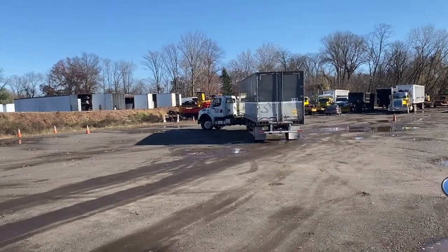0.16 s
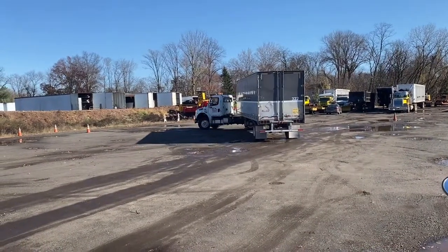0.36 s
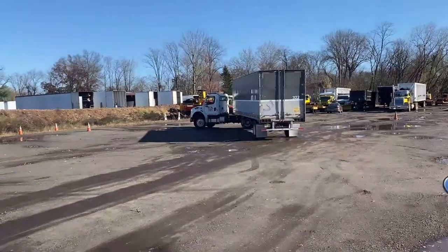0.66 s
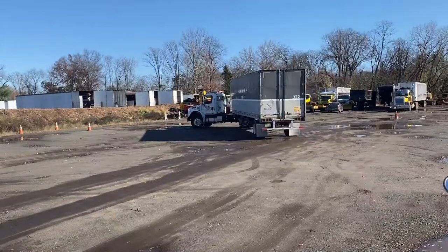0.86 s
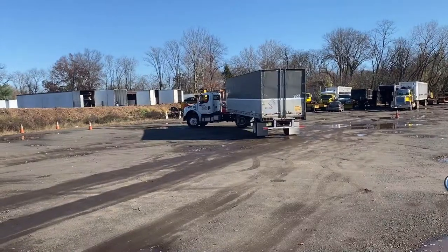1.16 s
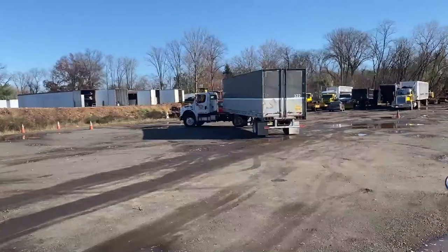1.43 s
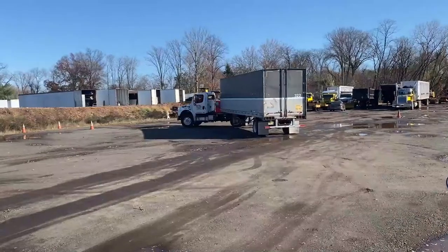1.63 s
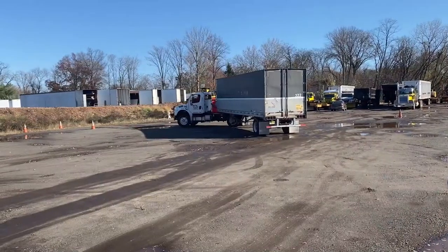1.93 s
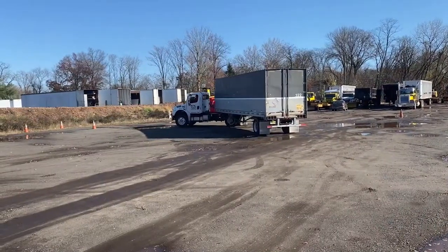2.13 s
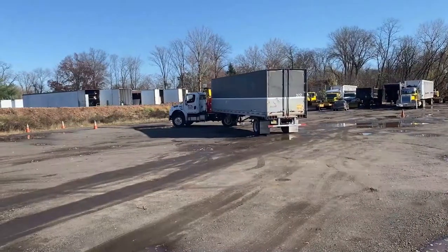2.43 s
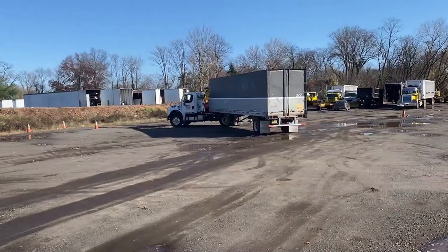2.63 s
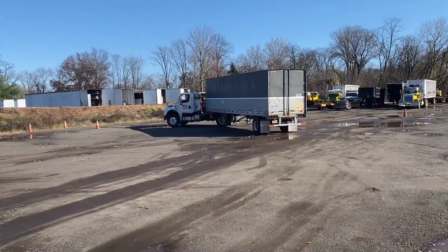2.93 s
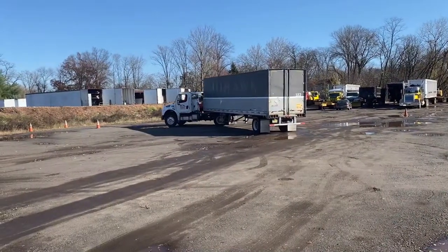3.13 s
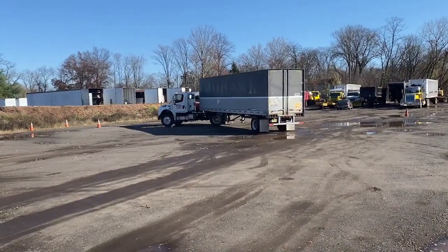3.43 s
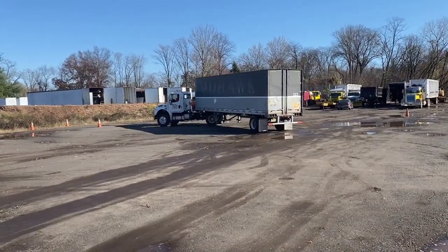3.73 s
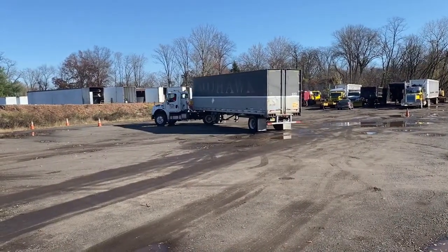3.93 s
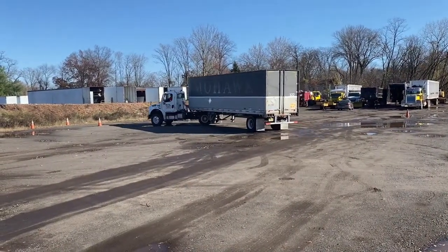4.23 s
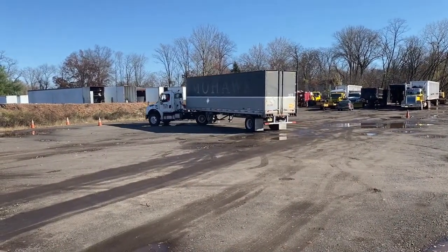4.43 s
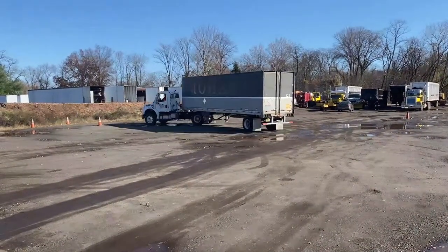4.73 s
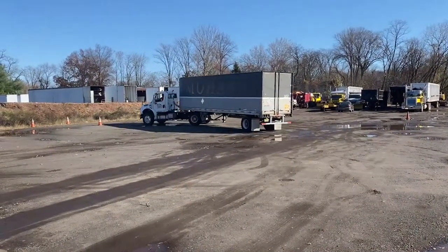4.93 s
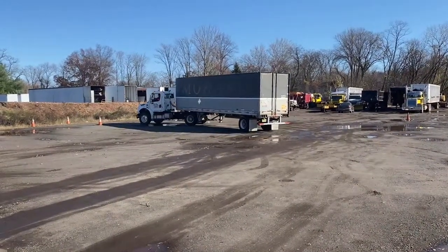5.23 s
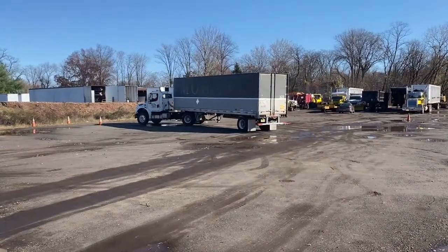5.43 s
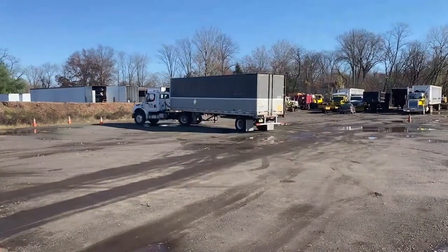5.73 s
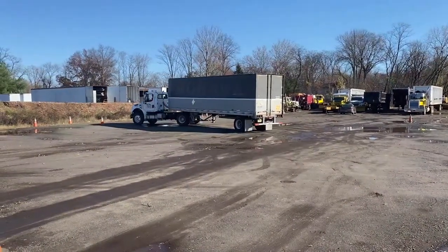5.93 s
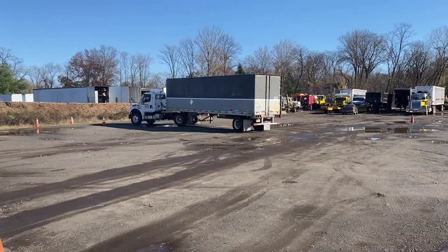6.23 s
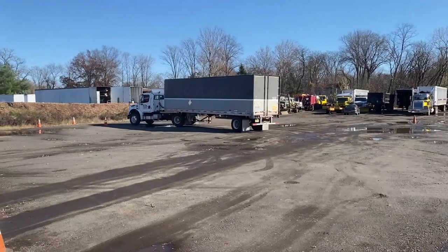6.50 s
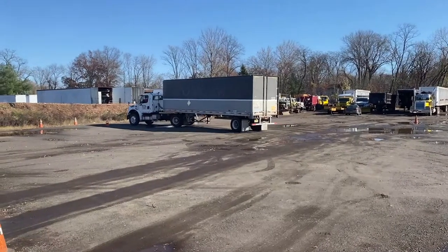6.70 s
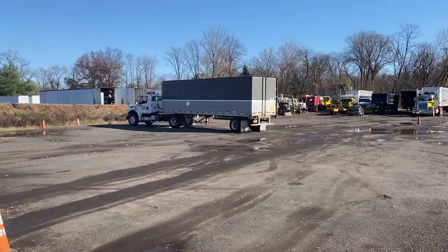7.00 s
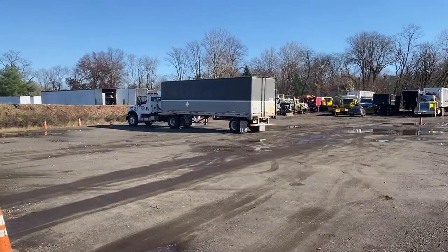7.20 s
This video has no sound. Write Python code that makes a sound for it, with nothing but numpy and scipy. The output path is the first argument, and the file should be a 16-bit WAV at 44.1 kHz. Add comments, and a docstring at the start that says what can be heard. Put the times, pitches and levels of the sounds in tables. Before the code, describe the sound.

Outdoors in an open gravel yard, a handheld phone catches dull wind thumps in the first second over a low murmur. A distant diesel idle, muffled behind its trailer, gradually emerges with clatter, ticking, fan hum and lumpy exhaust. Small grit cracks and brief chassis squeaks pass midway. Near the end wind knocks return, the heaviest just after seven seconds, and air hisses.

```python
"""A six-cylinder diesel truck creeps across an open yard at idle, slowly turning its engine towards a phone.
Exhaust lines, gears and a fan drone as fluttering tones; noise paced by the firings clatters, ticks and booms.
Gusts of low noise and falling-pitch eddies hit the microphone with dull, heavy thumps over the yard's murmur.
Short noise bursts make sharp cracks, fine grit crackles as clicks, the chassis squeaks as a rough sine,
tyres scuff as faint rasps, and air hisses near the end."""
import sys
import numpy as np
from scipy import signal
from scipy.fft import rfft, irfft, next_fast_len
from scipy.io import wavfile
from scipy.ndimage import uniform_filter1d

SR = 44100
rng = np.random.default_rng(int(sys.argv[2]) if len(sys.argv) > 2 else 0)


def store_wav(level_fs):
    """Save 16-bit WAV to argv[1]."""
    pcm = np.round(np.clip(np.atleast_2d(level_fs), -1, 1) * 32767)
    wavfile.write(sys.argv[1], SR, pcm.T.astype(np.int16))


N = 324576
TIME = np.arange(N) / SR
SIZE = next_fast_len(N + 8192)  # padding keeps filter tails from wrapping round
FREQS = np.maximum(np.fft.rfftfreq(SIZE, 1 / SR), 1)


def undb(db):
    """Decibels to gain."""
    return 10 ** (np.asarray(db) / 20)


def unit(x):
    """Scale to rms 1."""
    return x / np.sqrt(np.mean(x ** 2))


def curves(table):
    """One value a sample for each column after the time."""
    times, *columns = np.transpose(table)
    return [np.interp(TIME, times, column) for column in columns]


def spectra(table):
    """One value a frequency bin for each column, drawn over log frequency."""
    hz, *columns = np.transpose(table)
    return [np.interp(np.log(FREQS), np.log(hz), column) for column in columns]


def noise():
    """Three unrelated noises: one shared, one for each port."""
    return rng.standard_normal((3, N))


def filtered(x, gain):
    """Apply a gain to each frequency."""
    return irfft(rfft(x, SIZE) * gain, SIZE)[..., :N]


def colour(x, table, modes=()):
    """Filter by a smooth spectrum with narrow resonances on top; rms 1."""
    db = spectra(table)[0]
    for hz, width, boost in modes:
        db = db + boost / (1 + (2 * (FREQS - hz) / width) ** 2)
    return unit(filtered(x, undb(db)))


def bell(hz, sharpness):
    """Gain of a band around one pitch, even in log frequency."""
    return 1 / (1 + (sharpness * np.log(FREQS / hz)) ** 4)


def walk(rate):
    """Smooth random drift of rms 1 with wiggles up to about rate Hz."""
    steps = rng.standard_normal(N // 20)
    glide = np.interp(2 * rate * TIME, np.arange(len(steps)), steps)
    return unit(uniform_filter1d(glide, max(int(SR / rate / 2), 1)))


def swell(start, length):
    """A rounded rise and fall."""
    return np.sqrt(np.maximum(np.sin(np.pi * np.clip((TIME - start) / length, 0, 1)), 0))


def shadow(start, length, db):
    """Loss in dB behind the trailer, lifting steadily as the source swings clear."""
    return db * (1 - np.clip((TIME - start) / length, 0, 1))


def tone(turns, flutter, flutter_hz):
    """A steady core with a flutter of scattered sound around it; rms 1."""
    sway = 1 + flutter * (walk(flutter_hz) + 1j * walk(flutter_hz)) / np.sqrt(2)
    return unit(np.real(sway * np.exp(2j * np.pi * (turns + rng.random()))))


# the governor hunts around idle: (t/s, four-stroke cycle rate f/Hz)
CYCLE_RATE = [(3.1, 6.38), (3.49, 6.4), (3.57, 6.31), (3.73, 6.3), (3.91, 6.31), (3.99, 6.39), (4.39, 6.41),
              (4.61, 6.37), (6.02, 6.41), (6.4, 6.49)]


def crank():
    """Cycles turned so far: idle speed with a slight unsteadiness."""
    return np.cumsum(curves(CYCLE_RATE)[0] * (1 + 0.00154 * walk(3))) / SR


# relative knock of each cylinder in firing order: level/dB, before a random spread
CYLINDER_KNOCK = [4.85, 2.5, 3.1, 2.6, 6.2, 6]


def knocks(cycles, decay, smear_hz):
    """Each of six firings a cycle strikes the block and dies away; echoes off the chassis round the attack."""
    firing = cycles * len(CYLINDER_KNOCK)
    index = firing.astype(int)
    spread_db = 3.9 * np.tanh(rng.standard_normal(N))[index]
    size_db = np.array(CYLINDER_KNOCK)[index % len(CYLINDER_KNOCK)] + spread_db
    blows = undb(size_db) * np.exp(-(firing % 1) / decay)  # decay as a share of the firing gap
    return unit(filtered(blows, 1 / (1 + (FREQS / smear_hz) ** 2)))


def rattle(x, depth_db, rate_hz, count):
    """Each half-octave of the clatter flickers on its own as the blows excite different panels."""
    place = np.clip(2 * np.log2(FREQS / 400), 0, count - 1)
    out = 0
    for k in range(count):
        band = filtered(x, np.maximum(1 - np.abs(place - k), 0))
        out = out + band * undb(depth_db * walk(rate_hz))
    return out


# the engine grows louder as the cab turns into view: (t/s, level/dB before each layer's gain)
ENGINE_LEVEL = [(0.0, -75), (1.3, -67.5), (1.75, -63.5), (2.0, -59), (3.85, -56), (5.54, -54.5),
                (5.63, -53.5), (6.32, -53.5), (7.2, -50.5)]


def engine_level():
    """Level in dB that clatter, exhaust, fan and gravel follow, each with its own gain."""
    return curves(ENGINE_LEVEL)[0]


# ringing panels of the engine and cab: (f/Hz, width f/Hz, boost level/dB)
PANELS = [(551, 16, -4.5), (650, 80, -4.5), (836, 99, 6), (1086, 13, 5.5), (1173, 78, 2.5), (1303, 54, 3.5),
          (1490, 110, 3), (2060, 37, 1.5), (2366, 29, 4.5), (2507, 190, 8), (3300, 550, 4), (4800, 120, 3)]
# tone of the combustion clatter: (f/Hz, relative level/dB)
CLATTER_COLOUR = [(250, -2.5), (450, 2.5), (700, 0.5), (950, -0.5), (1250, -2.5), (1750, -8.5), (2250, -10),
                  (2650, -14), (2950, -19), (3380, -20.5), (3800, -23.5), (4800, -26.5), (8000, -56.5)]


def clatter(knock, block_db):
    """Combustion blows modulate noise that rings the panels."""
    blows = rattle(noise() * (1 + 0.7 * knock), depth_db=1.0, rate_hz=22, count=8)
    return colour(blows, CLATTER_COLOUR, PANELS) * undb(block_db + 10.5)


# tone of the valve ticking: (f/Hz, relative level/dB)
VALVE_COLOUR = [(2500, -20), (3400, -2), (4000, -4), (4800, -1), (6100, -7), (7500, -7), (9000, -13),
                (11500, -15), (15000, -26)]
# the engine's treble over time: (t/s, level/dB before the valve gain)
VALVE_LEVEL = [(0.0, -83.5), (2.0, -68), (3.21, -64.5), (3.31, -63), (3.33, -65.5), (6.58, -63.5),
               (7.2, -59)]


def valves(knock):
    """Valve ticking: bright noise pulsing with the firings, ringing the same panels."""
    ticking = noise() * (1 + 0.5 * knock)
    return colour(ticking, VALVE_COLOUR, PANELS) * undb(curves(VALVE_LEVEL)[0] + 0.5)


# tone of the exhaust puffs: (f/Hz, relative level/dB)
BOOM_COLOUR = [(25, -23), (55, -9), (90, 4), (130, -2.5), (190, -2), (240, -5), (300, 0.5), (380, -5),
               (500, -11), (700, -52), (1500, -78.5)]
# the engine's low, lumpy body over time: (t/s, level/dB)
BOOM_LEVEL = [(0.0, -74), (1.9, -61.5), (2.45, -56), (3.1, -47.5), (4.1, -47), (5.6, -43), (6.4, -40.5),
              (7.3, -39)]


def boom(cycles):
    """Lumpy exhaust puffs: low noise pushed by each firing, with uneven strength."""
    puffs = knocks(cycles, decay=0.4, smear_hz=90)
    lumps = noise() * (0.49 + puffs) * undb(0.81 * walk(9.7))
    return colour(lumps, BOOM_COLOUR) * undb(curves(BOOM_LEVEL)[0])


def engine_noise(cycles, block_db):
    """Combustion clatter, valve ticking and lumpy exhaust puffs, all paced by the firings."""
    knock = knocks(cycles, decay=0.95, smear_hz=111)
    return clatter(knock, block_db) + valves(knock) + boom(cycles)


# exhaust lines: (multiple of the cycle rate, level/dB before the engine level and gain, starts to clear t/s)
EXHAUST_LINES = [(12, -45.5, 2.3), (15, -41, 3), (24, -46, 2.4), (26, -58, 2.2), (30, -50.5, 2),
                 (34, -55, 1.4), (42, -54.5, 1.4), (45, -56, 2.0), (48, -53, 2.6), (63, -58, 1.7)]
PIPE_CLEAR_S, PIPE_SHADOW_DB = 1.04, -18.5  # time a line takes to clear the trailer; its loss behind it


def exhaust(cycles, block_db):
    """Low engine orders, each swaying in strength and coming out from behind the trailer in its own time."""
    out = 0
    for multiple, db, clears in EXHAUST_LINES:
        line_db = db + shadow(clears, PIPE_CLEAR_S, PIPE_SHADOW_DB)
        out = out + undb(line_db) * tone(multiple * cycles, flutter=0.65, flutter_hz=7)
    return out * undb(block_db + 52)


# wavering pitch of the fan: (t/s, f/Hz)
FAN_PITCH = [(2.2, 329.7), (2.28, 330.5), (2.46, 327.6), (2.61, 333.8), (3.44, 330.5), (3.72, 335.6),
             (4.38, 327.3), (4.77, 325.5), (5.04, 333.5), (5.23, 326), (6.5, 333.6)]


def fan(block_db):
    """The fan hums on a wavering pitch and throbs unevenly, hidden by the trailer, then a little by the cab."""
    trailer_db = shadow(start=2.05, length=0.2, db=-29)
    cab_db = shadow(start=3.87, length=0.31, db=-4)  # until the cab has turned
    throb = tone(np.cumsum(curves(FAN_PITCH)[0]) / SR, flutter=0.79, flutter_hz=16)
    return throb * undb(block_db + 9 + trailer_db + cab_db)


# gear hum: (multiple of the cycle rate, level/dB at its loudest, loudest at t/s, spread t/s)
GEAR_HUM = [(84, -52, 5.45, 0.14), (132.5, -54.5, 4.14, 1.7), (176, -51, 6.6, 0.45), (198.7, -63, 4.1, 0.8)]


def hum(cycles):
    """Rough gear tones follow the crank; each swells while its side of the engine faces the phone."""
    out = 0
    for multiple, db, facing, spread in GEAR_HUM:
        nearness = 1 / (1 + ((TIME - facing) / spread) ** 2)
        out = out + undb(db) * nearness * tone(multiple * cycles, flutter=0.68, flutter_hz=20)
    return out


def gravel(block_db):
    """Fine grit crackles all along, following the engine's level: sparse tiny clicks of random size."""
    clicks_per_s = 77
    clicks = (rng.random(N) < clicks_per_s / SR) * rng.standard_normal(N)
    return undb(block_db - 35) * unit(filtered(clicks, bell(6500, sharpness=2)))


# tone of the yard's murmur: (f/Hz, relative level/dB)
YARD_COLOUR = [(25, -13.5), (75, -5), (150, -7), (300, -5), (450, -10), (700, -17.5), (1200, -13),
               (1750, -21), (2500, -18), (3200, -37.5), (4400, -28.5), (7000, -76), (15000, -54)]


def yard():
    """The murmur of the yard: coloured noise that drifts slowly in level."""
    return colour(noise(), YARD_COLOUR) * undb(-59.0 + walk(0.51))


# tone of the breeze: (f/Hz, relative level/dB)
BREEZE_COLOUR = [(20, -33), (45, 8), (75, 6), (130, -1.5), (250, -13), (450, -20.5), (900, -83.5)]
# rumble of the breeze on the microphone: (t/s, level/dB before gain and wavering)
BREEZE_LEVEL = [(0.0, -51), (0.12, -57), (0.41, -38.5), (0.72, -56), (1.62, -58), (3.18, -69), (3.89, -52),
                (5.41, -53.5), (5.65, -53), (5.99, -43.5), (6.84, -44.5), (7.36, -37.5)]


def breeze():
    """Low turbulence on the microphone, wavering in level."""
    return colour(noise()[:2], BREEZE_COLOUR) * undb(curves(BREEZE_LEVEL)[0] + 5 + 2 * walk(6.1))


def gust(turbulence, start, length, db, edge_hz):
    """A swell of turbulence with a steep upper edge, levelled to the energy of its shape."""
    shape = swell(start, length)
    puff = filtered(turbulence, 1 / (1 + (FREQS / edge_hz) ** 5)) * shape
    return undb(db) * puff * np.sqrt(np.sum(shape ** 2) / np.sum(puff ** 2, axis=1, keepdims=True))


# gusts on the microphone: (start t/s, length t/s, level/dB, upper edge f/Hz)
GUSTS = [(0.094, 0.041, -38.5, 129), (0.292, 0.074, -32.5, 523), (0.36, 0.03, -26.5, 750),
         (0.401, .036, -33.5, 760), (0.438, 0.029, -33.5, 950), (0.509, 0.021, -38, 480),
         (0.63, .03, -49.5, 420), (0.725, 0.046, -43.5, 730), (1.255, 0.043, -45, 470),
         (2.116, 0.095, -41.5, 370), (2.282, 0.067, -46.5, 160), (2.467, 0.13, -44, 384),
         (2.769, 0.064, -43, 150), (5.789, .025, -33, 150), (5.835, 0.087, -29.5, 140),
         (6.17, .04, -32, 130), (6.238, 0.026, -33, 123), (6.488, .04, -30, 140),
         (6.519, 0.061, -27.5, 270), (6.62, 0.058, -36.5, 109.3), (6.883, 0.041, -32.5, 228),
         (7.162, 0.085, -19.5, 228), (7.248, 0.073, -36, 290)]
WAKE_S, WAKE_DB, WAKE_EDGE = 0.081, -7, 0.41  # wake length; level and edge (as a share) against its gust


def gusts():
    """Puffs of low turbulence, each trailing a weaker, duller wake."""
    turbulence = filtered(noise()[:2], 1 / (1 + (50 / FREQS) ** 4) / np.sqrt(1 + FREQS / 120))
    out = 0
    for start, length, db, edge_hz in GUSTS:
        out = out + gust(turbulence, start, length, db, edge_hz)
        out = out + gust(turbulence, start + length, WAKE_S, db + WAKE_DB, edge_hz * WAKE_EDGE)
    return out


EDDY_SLOWING = 0.41  # an eddy's pitch falls by this many factors e before it peaks


def eddy(start, hz, peak_turns):
    """A vortex passes the port: a blunt pressure swing that drops in pitch and dies within a few cycles."""
    age = TIME[:SR // 2]
    rise = np.log1p(EDDY_SLOWING * hz * age / peak_turns) / EDDY_SLOWING
    swing = (rise * np.exp(1 - rise)) ** 2 * np.sin(2 * np.pi * rise * peak_turns)
    blunting = signal.butter(3, 2 * hz, fs=SR, output="sos")
    swing = signal.sosfiltfilt(blunting, swing)
    return np.pad(swing, (int(start * SR), N))[:N]


SHRED_RISE_S, SHRED_FALL_S = 0.0021, 0.0094


def shreds(start, hz):
    """An eddy frays into smaller whirls that rattle briefly around it."""
    age = TIME[:SR // 4] - TIME[SR // 8]  # negative before the eddy starts
    band = signal.butter(4, [hz / 5, hz], "band", fs=SR, output="sos")
    whirls = unit(signal.sosfilt(band, rng.standard_normal(len(age))))
    whirls = whirls * np.exp(-np.maximum(-age / SHRED_RISE_S, age / SHRED_FALL_S))
    return np.pad(whirls, (int(start * SR), N))[SR // 8:][:N]


# eddies that knock on the microphone: (start t/s, level/dB, starting pitch f/Hz, cycles to the peak)
EDDIES = [(.312, -21.5, 717, 1.9), (.319, -19.5, 194, 0.55), (.333, -21, 258, 0.68),
          (0.338, -21.5, 720, 1.44), (.354, -23.5, 550, 1.17), (0.3673, -16, 520, 0.75),
          (0.375, -21, 508, 1), (.409, -21.5, 254, 0.9), (0.416, -21, 259, 0.69), (.433, -27, 1060, 1.4),
          (0.4456, -14.5, 740, 0.7), (0.454, -22, 108, 0.74), (.4925, -15, 800, 1.26),
          (0.501, -22, 173, 0.76), (.589, -28, 510, 0.44), (0.7561, -27.5, 1190, 0.58),
          (.794, -40.5, 420, 1.1), (0.86, -40.5, 520, 0.95), (0.875, -35, 380, 0.76),
          (0.925, -43.5, 720, 1.1), (0.974, -28.5, 760, 0.62), (0.981, -33, 152, 0.47),
          (1.161, -36, 390, 1.7), (1.273, -38.5, 454, 1.2), (1.293, -41, 130, 1.3), (1.34, -40, 430, 1.43),
          (1.607, -39.5, 400, 0.57), (1.945, -37, 240, 1.04), (2.071, -31, 397, 0.63),
          (2.163, -37.5, 322, 1.26), (2.626, -37.5, 170, 1.3), (2.794, -43, 150, 1.5),
          (5.954, -21, 111, 1.13), (6.139, -20.5, 150, 0.81), (6.527, -21.5, 348, 0.99),
          (6.539, -21.5, 275, 1.16), (6.551, -24, 114, 1.07), (6.720, -35, 225, 1.32),
          (6.950, -21, 214, 0.74), (7.118, -18.5, 105, 0.77), (7.1646, -4.5, 308, 0.91),
          (7.178, -10, 140, 0.89), (7.1926, -8.5, 176.5, 0.93), (7.226, -14.5, 135, 0.96)]


def eddies():
    """Single vortices, each wrapped in rough air 11 dB weaker."""
    out = 0
    for start, db, hz, turns in EDDIES:
        out = out + undb(db) * (eddy(start, hz, turns) + undb(-11) * shreds(start, hz))
    return out


WIND_LAG_S, WIND_UNLIKE = 0.00034, 0.38  # air reaches the left port later; gain of the opposed part


def wind():
    """Turbulence at the ports: a low breeze, gusts with their wakes, and single eddies."""
    air = breeze() + gusts()
    sides = np.array([[1], [-1]])
    lag = np.exp(-1j * np.pi * FREQS * sides * WIND_LAG_S)
    return filtered(air[0] + eddies(), lag) + WIND_UNLIKE * air[1] * sides


# sharp cracks: the first two are the bright edges of wind knocks, the rest may be stones under the tyres: #
# (start t/s, level/dB before attack and decay, centre f/Hz, decay t/s)
CRACKS = [(0.756, -43.5, 1600, 0.0042), (0.921, -55, 4700, 0.003), (3.048, -38, 10400, 0.0016),
          (3.251, -49.5, 5670, 0.0065), (3.300, -49, 5360, 0.007), (3.457, -46, 4770, 0.0041),
          (3.645, -59, 11500, 0.014)]


def cracks():
    """Sharp cracks: short bursts of noise around one pitch each, with a quick attack and decay."""
    out = np.zeros(N)
    attack_s = 0.0049
    for start, db, hz, decay in CRACKS:
        age = np.maximum(TIME - start, 0)
        burst = unit(filtered(rng.standard_normal(N), bell(hz, sharpness=2)))
        out += undb(db) * burst * (1 - np.exp(-age / attack_s)) * np.exp(-age / decay)
    return out


# chassis squeaks: (start t/s, length t/s, level/dB before roughness, lowest f/Hz before waver, sag as a share)
SQUEAKS = [(4.096, .068, -52, 2820, 0.003), (4.690, 0.083, -46.5, 2755, .06),
           (4.754, 0.04, -48, 2820, .015)]
SQUEAK_ECHO_S, SQUEAK_ECHO_DB = 0.0397, -13  # the trailer's side throws the squeak back


def squeaks():
    """A dry joint sings briefly and roughly as it sticks and slips; its pitch sags as it grips hardest."""
    out = 0
    waver = walk(260)
    grip = undb(3.5 * walk(75) - 1)
    for start, length, db, hz, sag in SQUEAKS:
        shape = swell(start, length)
        pitch = hz * (1 + 0.015 * waver + sag * (1 - shape))
        phase = 2 * np.pi * np.cumsum(pitch) / SR
        out = out + undb(db) * grip * shape ** 2 * (np.sin(phase) + 0.09 * np.sin(2 * phase))
    return out + undb(SQUEAK_ECHO_DB) * np.interp(TIME - SQUEAK_ECHO_S, TIME, out)


# tyres scuffing over sand: (start t/s, length t/s, level/dB)
SCUFFS = [(4.104, .1, -65), (4.447, .06, -65), (4.675, 0.12, -63.5)]


def scuffs():
    """The turning tyres drag over sand in short, faint rasps."""
    rough = rng.standard_normal(N) * undb(4.1 * walk(180))
    rasp = unit(filtered(rough, bell(4860, sharpness=4)))
    return rasp * sum(undb(db) * swell(start, length) for start, length, db in SCUFFS)


# tone of the hiss: (f/Hz, relative level/dB)
HISS_COLOUR = [(1500, 9), (3500, 0.5), (5800, 0.5), (8000, -8), (11500, -7), (15000, -13)]


def air_hiss():
    """A hiss of air near the cab: bright noise that opens fast and holds to the end."""
    start_s, attack_s = 7.24, 0.021
    opening = np.clip((TIME - start_s) / attack_s, 0, 1)
    return colour(noise(), HISS_COLOUR) * undb(-46.5) * opening


# the two microphone ports: (f/Hz, left minus right level/dB, left lead in radians, likeness 0-1)
PORTS = [(60, -1.5, .1, .93), (250, -2.5, -.2, .9), (490, -9, 0, .62), (620, -1, 1.8, .8), (900, 2, 2, .85),
         (1060, 7, 1, .8), (1380, 0, 1, .75), (1800, 6, 1, .8), (2050, 0, .5, .8), (2600, 2, .8, .8),
         (3100, 6, .6, .75), (4500, 2, .4, .7), (7000, 1, -.4, .55), (8000, 0, -.6, .6),
         (9000, 0, -3.1, .95), (9900, 0, 0, .7), (12000, 0, .2, .7), (13100, 0, 3.1, .95),
         (14500, 0, 1, .6)]


def ports(diffuse, direct):
    """The ports differ in level and phase; scattered sound reaches them partly unrelated."""
    tilt_db, lead, likeness = spectra(PORTS)
    shared = filtered(diffuse[0], np.sqrt(likeness))
    separate = filtered(diffuse[1:], np.sqrt(1 - likeness))
    sides = np.array([[.5], [-.5]])
    gain = undb(sides * tilt_db)
    gain = gain / np.sqrt(np.mean(gain ** 2, axis=0))  # same total power at each frequency
    return filtered(direct + shared + separate, gain * np.exp(1j * sides * lead))


def scene():
    """The truck over the murmur of the yard, with wind on top."""
    cycles = crank()
    block_db = engine_level()
    diffuse = engine_noise(cycles, block_db) + yard() + air_hiss()
    tones = exhaust(cycles, block_db) + fan(block_db) + hum(cycles)
    snaps = gravel(block_db) + cracks() + scuffs()
    return ports(diffuse, tones + squeaks() + snaps) + wind()


def record(dry):
    """The phone cuts the deepest rumble below 36 Hz and the top above 15.3 kHz."""
    dry = signal.sosfilt(signal.butter(4, 36, "high", fs=SR, output="sos"), dry)
    return signal.sosfilt(signal.ellip(8, .2, 70, 15300, fs=SR, output="sos"), dry)


dry = scene()
out = record(dry)
store_wav(out)
```